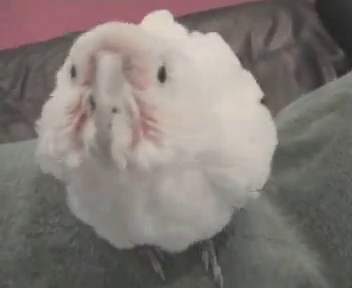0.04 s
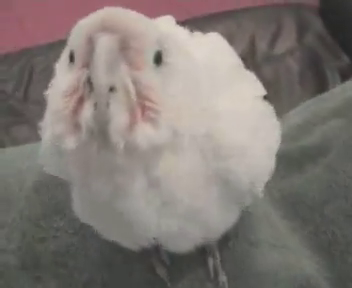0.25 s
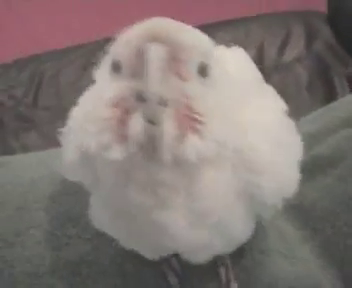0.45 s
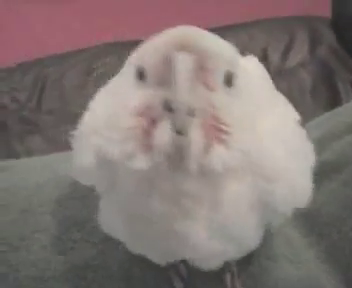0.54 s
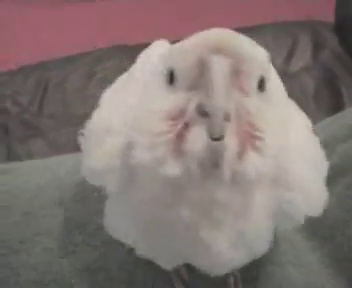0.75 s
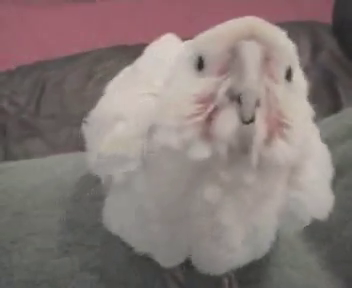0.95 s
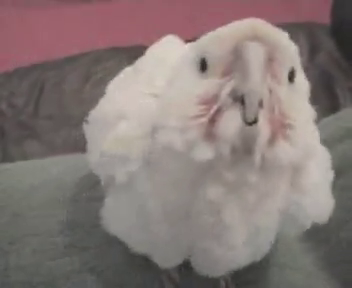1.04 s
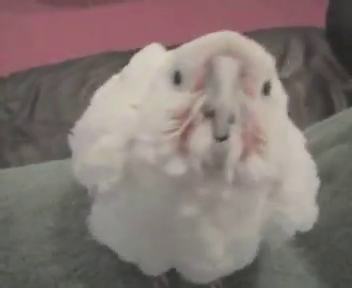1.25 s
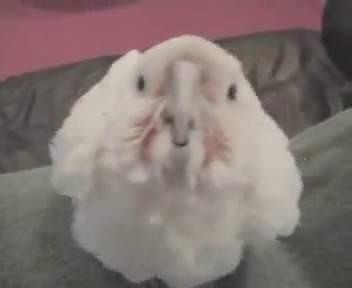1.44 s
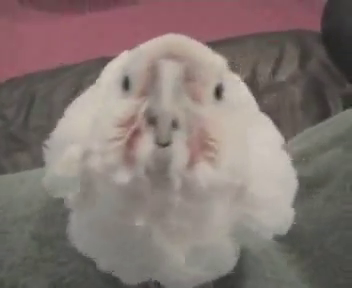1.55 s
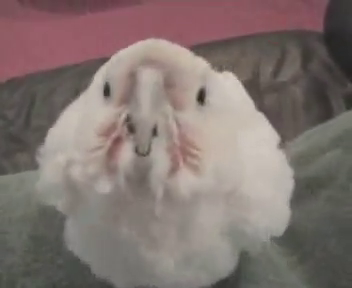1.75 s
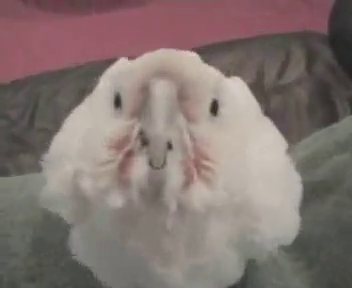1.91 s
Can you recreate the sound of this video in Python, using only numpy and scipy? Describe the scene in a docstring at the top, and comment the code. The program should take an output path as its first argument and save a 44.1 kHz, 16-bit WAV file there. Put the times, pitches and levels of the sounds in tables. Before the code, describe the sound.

A young cockatoo gives one raspy call close by in a quiet room. It starts with a soft rising squeak that cracks into separate clicks at about 0.15 seconds. The clicks quicken and grow into a harsh hiss by 0.7 seconds, loudest and briefly buzzy around 1 second. From 1.3 seconds the rasp slows and fades, ending in a short squeak near 1.6 seconds.

```python
"""A young cockatoo, close to the camera in a quiet, padded room, gives one long raspy begging call.
First a rising squeak cracks into single clicks: pulses from its voice box that make the throat ring.
The clicks speed up into a harsh hiss as the beak opens, then lock briefly into a buzzy tone.
At last they slow down and end in a second squeak. All along, the camera whines and ticks faintly."""
import sys
import numpy as np
from scipy import signal
from scipy.fft import rfft, irfft, next_fast_len
from scipy.io import wavfile
from scipy.ndimage import uniform_filter1d, map_coordinates

SR = 44100
rng = np.random.default_rng(int(sys.argv[2]) if len(sys.argv) > 2 else 0)


def dump_mix(stems):
    """Bounce the given channels to the path in sys.argv[1] as a 16-bit WAV at rate SR."""
    frames = np.atleast_2d(stems).T  # one column per channel
    limited = np.clip(frames, -1, 1)  # hard clip at full scale
    pcm = np.round(limited * 32767).astype(np.int16)
    wavfile.write(sys.argv[1], SR, pcm)


N = 88200


def rasp():
    """The voice box beats in pulses: uneven ones sound harsh, even ones buzz, slow ones slap twice."""
    # how hard the bird pushes (time [s], level [dB])
    effort = [(.225, -37.5), (.33, -36.5), (.41, -32.5), (.5, -30.5), (.555, -27.5), (.6, -28), (.66, -29),
              (.71, -25), (.85, -24.5), (.93, -23), (1.02, -24), (1.1, -26), (1.25, -26), (1.33, -28.5),
              (1.42, -31), (1.55, -36)]
    # how the voice box beats (time [s], rate [pulses/s], unevenness [0-1])
    beat = [(.225, 391, 0.31), (0.289, 273, 0.24), (0.361, 234, 0.12), (0.406, 192.4, 0.05),
            (.45, 214, 0.15), (0.531, 279, 0.07), (.553, 500, 0.28), (.578, 269, 0.09), (0.61, 212, 0.1),
            (.682, 329, .08), (0.698, 640, .26), (.81, 656, 0.2), (.86, 581, .28), (0.926, 700, 0.21),
            (.94, 716, 0.03), (1.03, 692, 0.03), (1.049, 620, .26), (1.152, 645, 0.2), (1.259, 616, 0.34),
            (1.279, 705, 0.03), (1.303, 723, 0.07), (1.334, 374, 0.27), (1.409, 300, 0.2),
            (1.459, 213, 0.3), (1.54, 185, 0.31)]
    # short gaps where the voice catches (start [s], end [s])
    pauses = [(.25, .262), (.31, .321), (.329, .3555), (.365, .3885), (.395, .4065), (.443, .4525),
              (.5425, .551), (.562, .5672), (.875, .8895), (.9295, .9345), (1.0725, 1.077), (1.17, 1.1752),
              (1.232, 1.2352), (1.242, 1.251), (1.348, 1.357), (1.404, 1.4125), (1.4265, 1.4305)]
    t, end_s = .224, 1.547
    slap_delay_s, slap_below_hz = 0.000596, 650  # faster beating leaves no time for a second slap
    chances = np.clip(rng.standard_normal((2000, 4)), -2, 2)
    pulses = []
    for k, (wait_luck, size_luck, tuning_luck, slap_luck) in enumerate(chances):
        rate, uneven = at(beat, t)
        alternate = (-1) ** k  # every second pulse is later and stronger
        wait = np.exp(uneven * wait_luck - uneven ** 2 / 2)
        t += wait * (1 + 0.065 * alternate) / rate
        t = next((end for start, end in pauses if start < t < end), t)
        if t > end_s:
            break
        accent_db = 2.1 * alternate + size_luck * (0.36 + 2 * uneven)
        slap_share = 0.47 * max(1 - (rate / slap_below_hz) ** 2, 0)
        size = amp(accent_db) * wait  # larger after a longer wait
        size *= np.sqrt(SR / rate / (1 + slap_share ** 2))  # same power at any rate
        retune = 1 + 0.052 * uneven * tuning_luck
        slap_time = t + slap_delay_s * np.exp(0.33 * slap_luck)
        pulses += [(t, size, retune), (slap_time, slap_share * size, retune)]
    times, sizes, retunes = np.transpose(pulses)
    return throat(times, sizes * amp(at(effort, times)[0]), retunes)


def throat(times, sizes, retune, by_peak=False):
    """Each pulse rings the throat, coloured by how far the beak is open, and lets out a puff of air."""
    # how far the beak is open (time [s], opening [0 shut, 1 half, 2 wide])
    beak = [(.34, 0), (.385, 0.0059), (.425, 0.97), (.6, 0.96), (.71, 2), (1.3, 1.865), (1.4, 1.67),
            (1.55, 1.6)]
    # how the throat's ringing shifts up and down (time [s], frequency [ratio])
    tuning = [(.16, 1.024), (.27, 0.97), (.35, 1.082), (.43, .98), (.65, 1.017), (.8, 1), (1.05, 1.013),
              (1.28, 1.016), (1.5, 1.037)]
    # the throat's tone with the beak shut, half open and wide (frequency [Hz], relative level [dB])
    shut = [(88, -55), (150, -34), (280, -25), (460, -12), (870, -8), (1230, -11), (2390, 2), (2900, -7.5),
            (3500, -10), (4600, -4), (5560, -18.5), (7250, -14), (8000, -45), (8600, -48), (11000, -46),
            (14300, -67), (22000, -100)]
    half = [(88, -40), (150, -39), (168, -34), (238, -32.5), (350, -21), (486, -10.5), (1010, -8.5),
            (1270, -15.5), (2550, 1), (3210, -15.5), (3600, -5), (4290, -13), (5000, -2), (6550, -40),
            (8580, -48.5), (13400, -71), (15000, -110)]
    wide = [(71, -73), (120, -33), (330, -18.5), (500, -16.5), (700, -11.5), (995, -8.5), (1270, -20.5),
            (1490, -10), (1910, -11), (2590, 3), (3300, -6), (3810, -1.5), (4220, -8.5), (4960, -0.5),
            (5400, -12), (6330, -33), (7850, -34.5), (8500, -51), (9600, -53.5), (10500, -41), (12100, -64),
            (13200, -34), (14200, -66), (16000, -53)]
    # how a pulse starts at those three openings (sharpness [0 as slow as its fade, 1 sudden])
    sharpness = [1, 0.98, 0.62]
    length, lead = 512, 64  # samples in a pulse, and how many come before its strike
    air_db, air_fade_s = -11.5, 0.0034
    rings = [ring(tone, sharp, length, lead) for tone, sharp in zip((shut, half, wide), sharpness)]
    opening, = at(beak, times)
    speed = at(tuning, times)[0] * retune
    index = (times * SR).astype(int)[:, None] + np.arange(length) - lead
    place_in_ring = (index - times[:, None] * SR) * speed[:, None] + lead
    shares = [np.clip(1 - abs(opening - k), 0, 1) for k in range(3)]
    waves = sum(share[:, None] * map_coordinates(r, [place_in_ring]) for share, r in zip(shares, rings))
    waves = windpipe_and_beak(waves, times)
    puff = np.exp(-np.arange(length) / SR / air_fade_s)
    air = rng.standard_normal(waves.shape) * np.sqrt(puff / puff.sum())
    waves += amp(air_db) * signal.fftconvolve(waves, air, axes=1)[:, :length]
    gains = sizes / (abs(waves).max(axis=1) if by_peak else np.linalg.norm(waves, axis=1))
    return np.bincount(index.ravel(), (waves * gains[:, None]).ravel(), N)[:N]  # add up all pulses


def ring(tone, sharpness, length, lead, size=4096):
    """The throat's short ringing after one strike, scaled to an energy of 1."""
    log_gain = np.log(amp(along(tone, np.fft.rfftfreq(size, 1 / SR))))
    shape = irfft(log_gain)
    # move sound from before the strike to after it, keeping the same tone
    shape[1:size // 2] *= 1 + sharpness
    shape[size // 2 + 1:] *= 1 - sharpness
    wave = np.roll(irfft(np.exp(rfft(shape))), lead)[:length]
    return wave / np.linalg.norm(wave)


def windpipe_and_beak(waves, times):
    """The windpipe holds one band back, smearing each pulse; the beak hollows out or lifts another."""
    # a dip that climbs as the beak parts, then turns into a peak (time [s], frequency [Hz], gain [dB])
    notch = [(.16, 3050, -2.5), (.27, 3180, -22), (.35, 3730, -11), (.39, 4380, -22), (.415, 5740, -17),
             (.45, 6750, -14), (.52, 6900, 10), (.68, 7000, 6)]
    notch_width_hz, held_hz, held_width_hz = 1860, 3120, 2140
    centre_hz, gain_db = (column[:, None] for column in at(notch, times))
    hz = np.fft.rfftfreq(waves.shape[1], 1 / SR)
    smear = np.exp(-2j * np.arctan2(hz * held_width_hz, held_hz ** 2 - hz ** 2))
    off_centre, loss = centre_hz ** 2 - hz ** 2, 1j * hz * notch_width_hz
    hollow = (off_centre + amp(gain_db) * loss) / (off_centre + loss)
    return irfft(rfft(waves) * smear * hollow)


def clicks():
    """Single hard pulses of the voice box ring the throat."""
    # the hard pulses (time [s], peak level [dB])
    strikes = [(0.1653, -19.5), (0.203, -22.5), (0.2177, -25.5), (.254, -22.5), (0.3159, -21),
               (0.3302, -22), (.346, -19.5), (0.3743, -21), (0.3817, -18.5), (.399, -19.5), (0.4465, -14.5),
               (0.5476, -12.5), (0.8767, -10), (.888, -10), (1.2499, -8.5)]
    times, peak_db = np.transpose(strikes)
    return throat(times, amp(peak_db), retune=1, by_peak=True)


def crack(start_s=.142, count=11, rate_hz=870, jitter_s=0.00021, dull_above_hz=1790, level_db=-37.5):
    """The first squeak breaks into a short flutter of soft, uneven pulses."""
    times = start_s + np.arange(count) / rate_hz + jitter_s * rng.standard_normal(count)
    flutter = throat(times, np.ones(count), retune=0.93)
    flutter = filtered(flutter, lambda hz: 1 / (1 + 1j * hz / dull_above_hz) ** 2)
    share_of_scene = count / rate_hz * SR / N
    return amp(level_db) * unit(flutter) * np.sqrt(share_of_scene)


def squeaks():
    """A rising squeak opens the call; a shorter one that quickly dulls closes it."""
    # the path of each squeak (time [s], pitch [Hz], level [dB])
    first_path = [(.036, 904, -78), (.05, 1004, -41), (.066, 1090, -39.5), (.11, 1300, -40),
                  (.135, 1348, -38), (.146, 1330, -43), (.156, 1200, -59)]
    last_path = [(1.55, 1207, -56), (1.554, 1112, -39), (1.562, 1089, -43), (1.58, 1079, -42.5),
                 (1.6, 1098, -48), (1.617, 1050, -57)]
    # the tones in each squeak (multiple of the pitch [ratio], added level [dB])
    first_tones = [(1, 1), (2, -7.5), (3, -14.5), (4, -15.5), (5, -20), (6, -47)]
    last_tones = [(1, 4.5), (2, 2), (3, 7.5), (4, 0), (5, -9), (6, -53)]
    return whistle(first_path, first_tones) + whistle(last_path, last_tones, dulling_db_per_s=108)


def whistle(path, tones, dulling_db_per_s=0, waver=0.0059):
    """A clean, slightly wavering note; with dulling, its higher overtones fade faster."""
    t = np.arange(N) / SR
    start_s, end_s = path[0][0], path[-1][0]
    hz, db = at(path, t)
    phase = 2 * np.pi * np.cumsum(hz * (1 + waver * wander(90))) / SR
    sounding = uniform_filter1d(1. * ((t > start_s) & (t < end_s)), size=90)
    dulled_db = dulling_db_per_s * np.maximum(t - start_s, 0)
    return sounding * sum(amp(db + added - (k - 1) * dulled_db) * np.sin(k * phase) for k, added in tones)


def camera(tick_start_s=0.0196, ticks_per_s=30, tick_hz=1950, tick_db=-57, tick_width_s=0.0028):
    """The camera's steady whine and its faint, rapid ticking."""
    # the camera's steady tones (frequency [Hz], level [dB])
    hum = [(73, -85), (1259, -74), (3400, -76)]
    tones = hum + [(15673, -72)]  # plus a very high whistle
    t = np.arange(N) / SR
    whine = sum(np.sqrt(2) * amp(db) * np.sin(2 * np.pi * (hz * t + rng.random())) for hz, db in tones)
    from_tick_s = (((t - tick_start_s) * ticks_per_s + .5) % 1 - .5) / ticks_per_s
    swell = np.exp(-(from_tick_s / tick_width_s) ** 2 / 2)
    return whine + amp(tick_db) * swell * np.sin(2 * np.pi * tick_hz * t + wander(1500))


def room_noise(level_db=-57):
    """A soft rush from the room and camera, partly alike on the left and right."""
    # the tone of the rush (frequency [Hz], relative level [dB])
    tone = [(25, -20), (45, -11), (72, -2), (110, -6), (180, -8), (260, -5), (450, -11), (750, -9),
            (1200, -7), (1550, -16), (1900, -13), (2700, -18), (3350, -14), (3750, -17), (4500, -5),
            (5000, -10), (6000, -18), (8500, -20), (12000, -24), (15000, -29), (16000, -29)]
    # how alike left and right are (frequency [Hz], likeness [0-1])
    alike = [(60, 0.48), (180, 0.4), (550, 0.2), (1650, 0.64), (4970, 1), (9000, 0.13), (15000, 0.13)]

    def gains(hz):
        angle = np.arccos(along(alike, hz)) / 2
        return amp(along(tone, hz)) * [np.cos(angle), np.sin(angle)]

    mid, side = filtered(rng.standard_normal((2, N)), gains)
    return amp(level_db) * unit(np.array([mid + side, mid - side]))


def amp(db):
    """Turn decibels into a gain."""
    return 10 ** (np.asarray(db) / 20)


def unit(x):
    """Scale a sound to an average power of 1."""
    return x / np.sqrt(np.mean(x ** 2) + 1e-20)


def wander(samples):
    """A random drift: noise smoothed over this many samples."""
    return unit(uniform_filter1d(rng.standard_normal(N), size=samples))


def along(points, hz):
    """Read a (frequency, value) table at hz, with octaves evenly spaced."""
    frequencies, values = np.transpose(points)
    return np.interp(np.log(hz + 1), np.log(frequencies + 1), values)


def at(rows, t):
    """Read each value column of a time table at times t."""
    times, *columns = np.transpose(rows)
    return [np.interp(t, times, column) for column in columns]


def filtered(x, response):
    """Give each frequency in x the gain that response(hz) returns."""
    size = next_fast_len(N + SR // 2)
    return irfft(rfft(x, size) * response(np.fft.rfftfreq(size, 1 / SR)), size)[..., :N]


def scene():
    """The bird straight ahead, over the quiet background."""
    bird = rasp() + clicks() + crack() + squeaks()
    return bird + room_noise() + camera()


def record(dry):
    """The camera cuts off the very highest treble."""
    return filtered(dry, lambda hz: hz < 15850)


dry = scene()
out = record(dry)
dump_mix(out)
```